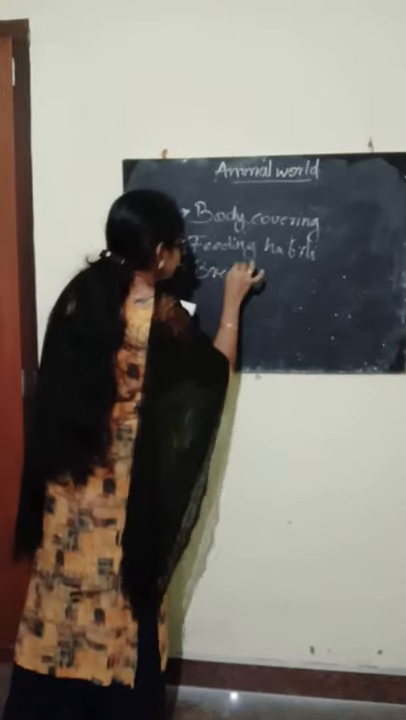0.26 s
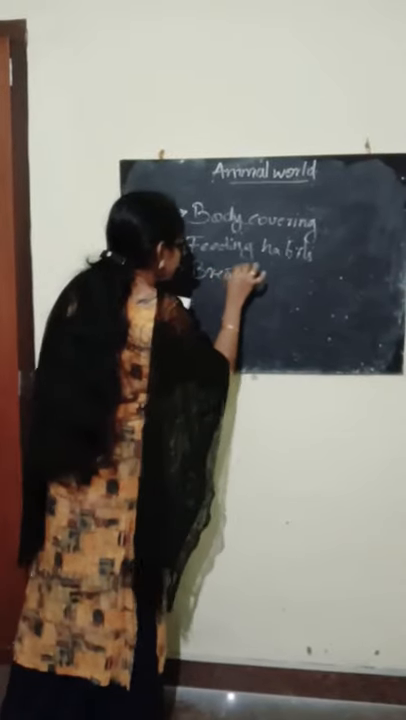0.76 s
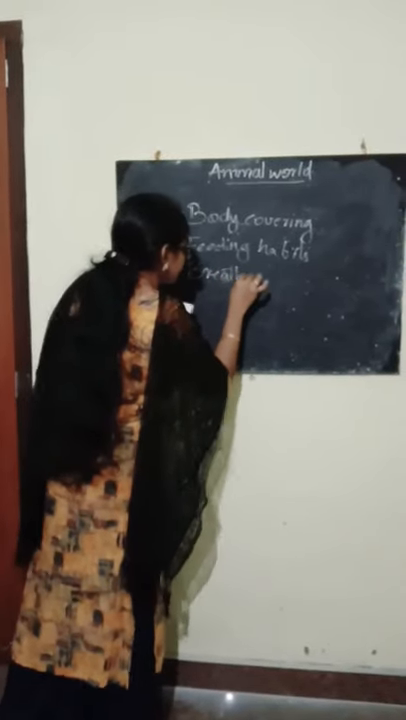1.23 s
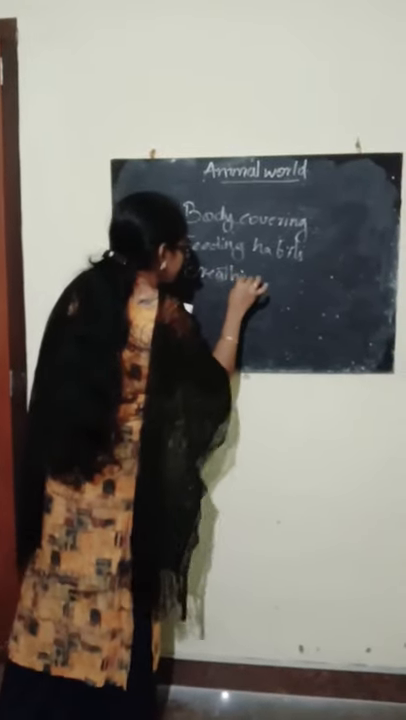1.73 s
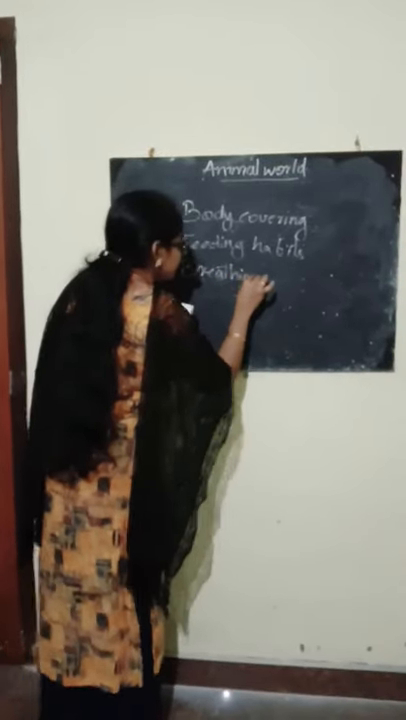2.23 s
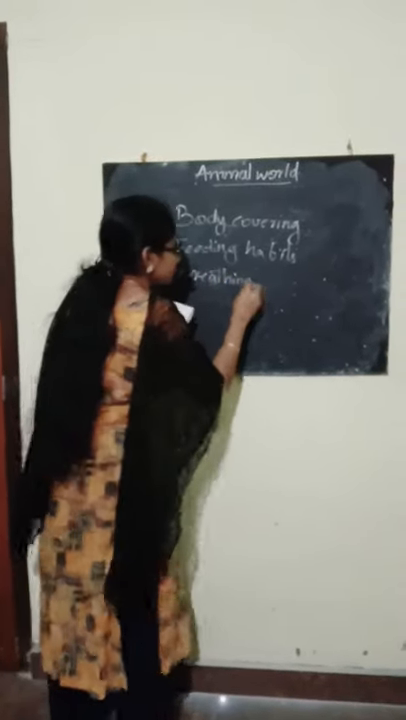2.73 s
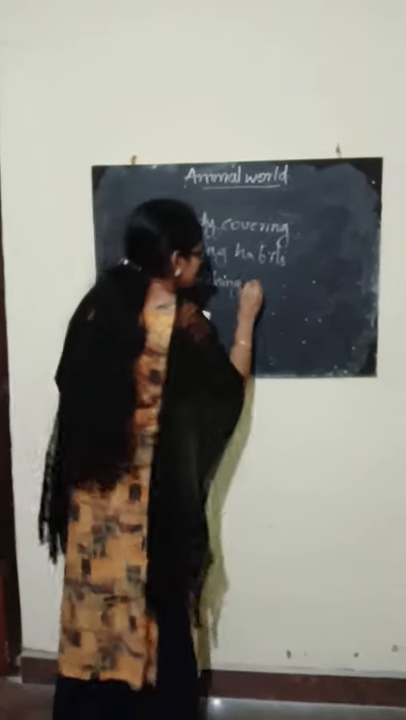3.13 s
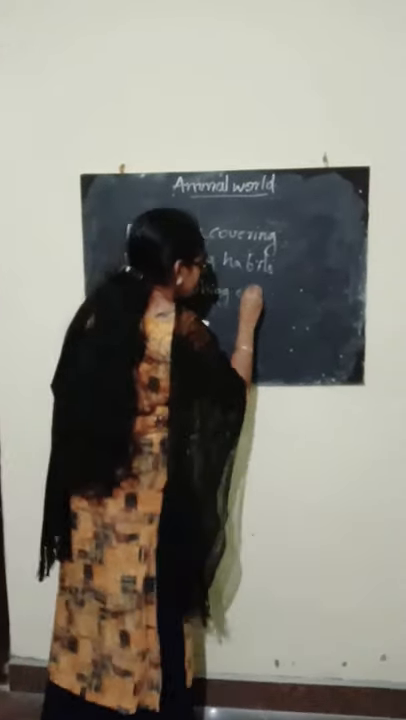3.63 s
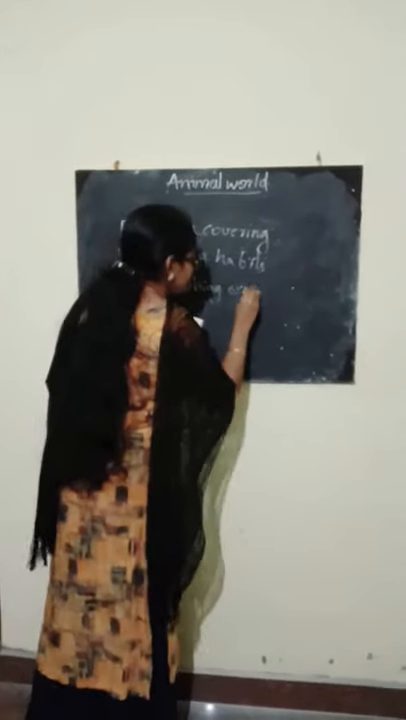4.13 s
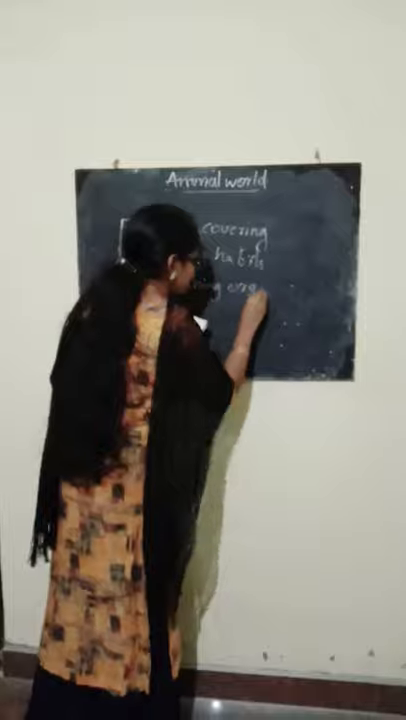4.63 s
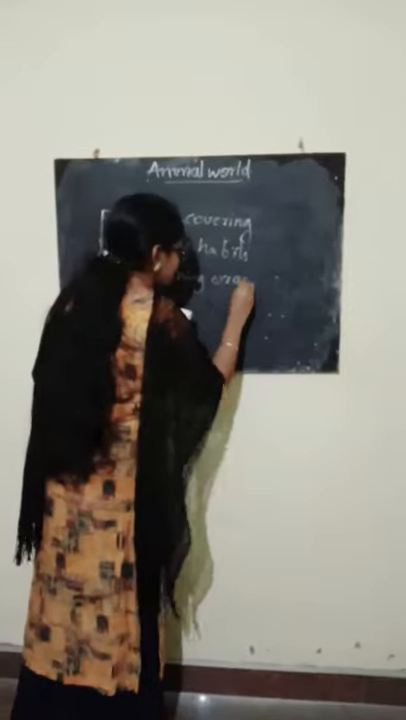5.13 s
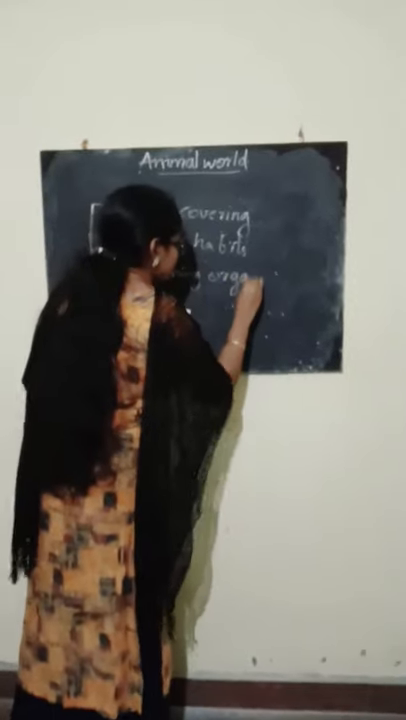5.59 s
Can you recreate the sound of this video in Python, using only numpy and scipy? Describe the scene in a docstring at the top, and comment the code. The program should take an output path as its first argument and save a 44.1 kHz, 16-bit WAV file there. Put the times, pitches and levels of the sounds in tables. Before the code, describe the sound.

Dry chalk strokes drum, rasp and hiss against a resonant board, mixed with woody knocks and a few very brief groans or squeaks. The rhythm is handwriting-like, with tiny gaps and a lull near the middle. A faint whirr and soft room hiss stay behind; the sound is nearly mono, roomy and somewhat nasal.

```python
"""Chalk writing on a blackboard

Chalk knocks on a wall-hung board in a small, bare room: filtered impulse responses with echoes and a decaying tail.
Its dragging strokes are random trains of stick-slip pulses that drum, rasp and hiss; narrow noise bands squeak.
Board resonances colour the chalk; steady air noise and a faint whirr lie behind, heard by a nasal microphone."""
import sys
import numpy as np
from scipy import signal
from scipy.fft import rfft, irfft, next_fast_len
from scipy.io import wavfile

SR = 44100
rng = np.random.default_rng(int(sys.argv[2]) if len(sys.argv) > 2 else 0)


def bounce(signal):
    """Save signal as a 16-bit WAV file at the path given by the first command-line argument."""
    frames = np.transpose(np.atleast_2d(signal))
    limited = np.clip(frames, -1, 1)
    pcm = np.round(limited * 32767).astype(np.int16)
    wavfile.write(sys.argv[1], SR, pcm)


N = 258381
TIME = np.arange(N) / SR


def from_db(db):
    """Level to amplitude: 20 dB is a factor of ten."""
    return 10 ** (np.asarray(db) / 20)


def rms_one(x):
    """Normalisation to unit root-mean-square amplitude."""
    return x / np.sqrt(np.mean(x ** 2) + 1e-20)


def at_hz(points, hz):
    """Linear interpolation of a table along a logarithmic frequency axis."""
    known_hz, values = np.transpose(points)
    return np.interp(np.log(np.maximum(hz, 1)), np.log(known_hz), values)


def colour(x, spectrum):
    """Minimum-phase filtering: folding the cepstrum makes the (hz, level_db) outline causal."""
    size = next_fast_len(len(x) // 2 + 4096) * 2
    gain = from_db(at_hz(spectrum, np.fft.rfftfreq(size, 1 / SR)))
    cepstrum = irfft(np.log(gain))
    cepstrum[1:size // 2] *= 2
    cepstrum[size // 2 + 1:] = 0
    response = np.exp(rfft(cepstrum))
    return irfft(rfft(x, size) * response)[:len(x)]


def resonate(x, peaks):
    """Modal resonance: a chain of two-pole, two-zero filters lifts or dips (hz, width_hz, lift_db)."""
    for hz, width_hz, lift_db in peaks:
        half_width = np.pi * width_hz / SR
        turn = -2 * np.cos(2 * np.pi * hz / SR)
        zero = half_width * max(from_db(lift_db), 1)
        pole = half_width * max(from_db(-lift_db), 1)
        x = signal.lfilter([1 + zero, turn, 1 - zero], [1 + pole, turn, 1 - pole], x)
    return x


def taps(level_db=0.0, mode_width_hz=90, spot_depth=0.26):
    """Impact excitation: soft contact dulls a click, panel give deepens it and the spot struck picks a mode."""
    # chalk set down on the board: start_s, strength_db, contact cut-off contact_hz, steepness of that cut,
    # extra low panel thump_db, most excited mode_hz, its lift mode_db
    touches = [(0.3184, 6, 11200, 2.9, 2, 1260, 2.5), (0.6285, -0.5, 5500, 6, 3.5, 510, 5),
               (1.285, -7, 3800, 9, 5, 404, 9.5), (1.529, -0.5, 3720, 3.3, 8, 406, 1.5),
               (1.709, 1.5, 3440, 5.2, 5.5, 1170, 3), (3.5825, 1, 3570, 2.23, 5.5, 1230, 7),
               (4.024, 1.5, 3200, 3.14, 1.5, 800, 4), (4.869, -13.5, 1810, 7.5, -3, 910, 4.5)]
    # sound of a hard knock: hz, level_db
    hard_knock = [(50, -28), (100, -13), (180, -9.5), (300, -13), (500, -3), (800, -4), (1200, -3),
                  (1900, 0), (2800, -7), (4000, -6.5), (5600, -5.5), (8000, -6.5), (11000, -21),
                  (15000, -17)]
    out = np.zeros(N)
    hz = np.geomspace(30, SR / 2, 60)
    t = TIME[:SR // 100]
    for start_s, strength_db, contact_hz, steepness, thump_db, mode_hz, mode_db in touches:
        contact = -10 * np.log10(1 + (hz / contact_hz) ** steepness)
        thump = thump_db / (1 + (hz / 700) ** 2)
        knock = colour(room_response(), np.c_[hz, at_hz(hard_knock, hz) + contact + thump])
        # bending waves return from the edges of the panel within a few milliseconds
        edges = rng.standard_normal(len(t)) * np.exp(-t / .003)
        edges /= np.linalg.norm(edges)
        knock = knock + spot_depth * signal.fftconvolve(knock, edges)[:len(knock)]
        knock = resonate(knock, [(mode_hz, mode_width_hz, mode_db)]) / np.hypot(1, spot_depth)
        start = round(start_s * SR)
        out[start:start + len(knock)] += from_db(level_db + strength_db) * knock[:N - start]
    return out


def room_response(early_db=0.5, sparse_db=3.5):
    """Reverberation: direct path and wall echoes over diffuse reflections that decay by band, at unit energy."""
    # reverberation time of the room: hz, t60_s
    decay_times = [(150, 0.44), (400, 0.4), (1200, 0.42), (3000, 0.4), (7000, 0.43), (14000, 0.31)]
    # straight path and first wall echoes: delay_s, height relative to a tail of unit energy
    first_echoes = [(0, 0.11), (.004, 0.13), (0.0114, .15), (.018, 0.15)]
    t = TIME[:SR * 3 // 4]
    # random levels make the reflections sparse
    uneven = from_db(sparse_db * rng.standard_normal(len(t)))
    scatter = rfft(rng.standard_normal(len(t)) * uneven)
    hz = np.fft.rfftfreq(len(t), 1 / SR)
    tail = 0
    for centre_hz, t60_s in decay_times:
        band = at_hz([(f, f == centre_hz) for f, _ in decay_times], hz)
        tail = tail + irfft(scatter * band, len(t)) * from_db(-60 * t / t60_s)
    # reflections thicken within a few milliseconds; the lift from the near walls fades around 25 ms
    build_up = 1 - .78 * np.exp(-t / .0035)
    near_walls = 1 / (1 + (t / .025) ** 6)
    tail *= build_up * from_db(early_db * near_walls)
    tail /= np.linalg.norm(tail)
    for delay_s, height in first_echoes:
        tail[round(delay_s * SR)] += height
    return tail / np.linalg.norm(tail)


def strokes():
    """Stick-slip friction: coarse slips shake the panel, finer ones rasp, crumbling powder hisses."""
    # colours of the three parts: hz, level_db
    drum_colour = [(50, -29), (110, -9.5), (190, -3.5), (340, -1), (520, 7), (850, 0), (1300, -12.5),
                   (2500, -33)]
    rasp_colour = [(600, -44.5), (1200, 4.5), (1900, 4), (2700, -1), (4000, -4.5), (5500, -8), (9000, -34)]
    powder_colour = [(2500, -26), (4200, -5), (5600, -2), (8000, 1), (11000, -25.5), (15000, -17)]
    drumming = stroke_level(0, brush_db=-77.5) * friction(drum_colour, slips_per_s=1200)
    rasp = stroke_level(1, brush_db=-74.5) * friction(rasp_colour, slips_per_s=2000)
    powder = stroke_level(2, brush_db=-80.5) * friction(powder_colour, slips_per_s=4400)
    return drumming + rasp + powder


def stroke_level(part, brush_db):
    """Energy build-up and decay: speed arches add power to a light brushing, drawn out by the room."""
    # pulls of the chalk: start_s, length_s, then levels before the room's smoothing: drum_db, rasp_db, powder_db
    pulls = [(0.0, 0.034, -57, -64.5, -67.5), (0.1, 0.086, -67.5, -83, -69), (0.397, .10, -54.5, -58, -67),
             (0.682, 0.087, -60.5, -67, -61), (0.858, 0.11, -61, -72, -64),
             (1.012, 0.085, -59.5, -67.5, -65.5), (1.129, 0.061, -63, -69, -67),
             (1.35, 0.054, -58, -73, -65), (1.863, 0.072, -65.5, -81, -70),
             (1.967, 0.079, -77, -71.5, -67.5), (2.06, 0.12, -65, -69.5, -69),
             (2.199, 0.12, -76, -68, -64.5), (2.305, 0.068, -67, -67, -66), (2.41, .10, -67.5, -67.5, -59),
             (2.474, 0.12, -57.5, -61, -66), (2.546, 0.12, -62.5, -61, -59), (2.675, .09, -84, -77, -72.5),
             (2.998, 0.13, -71, -75.5, -94), (3.132, 0.045, -67, -69, -72.5),
             (3.183, 0.14, -76, -71, -66.5), (3.313, 0.082, -54, -57, -67),
             (3.412, 0.066, -66.5, -66.5, -64.5), (3.698, 0.073, -65.5, -70, -65.5),
             (3.833, 0.088, -61, -67, -66.5), (4.095, 0.2, -77, -71.5, -70.5),
             (4.294, 0.057, -63, -66.5, -71), (4.411, 0.14, -59, -74, -60.5), (4.556, .15, -60, -62, -61.5),
             (4.856, 0.064, -74, -68, -91), (5.06, 0.089, -69, -74, -69), (5.188, 0.11, -68, -64, -68.5),
             (5.336, 0.079, -64.5, -64.5, -63), (5.585, 0.067, -69.5, -81, -70),
             (5.691, .12, -64, -66, -64.5)]
    # the hand rests and the brushing stops: from_s, to_s
    rest_from_s, rest_to_s = (2.8, 3.14)
    speed_power = 0.55  # amplitude follows hand speed to this power
    linger_t60_s = 0.27
    brushing = (TIME < rest_from_s) | (TIME > rest_to_s)
    power = from_db(brush_db) ** 2 * brushing
    for start_s, length_s, *levels_db in pulls:
        speed = np.sin(np.pi * np.clip((TIME - start_s) / length_s, 0, 1))
        power = power + (from_db(levels_db[part]) * speed ** speed_power) ** 2
    # share of the power left after one sample
    left = from_db(-60 / (linger_t60_s * SR)) ** 2
    return np.sqrt(signal.lfilter([1 - left], [1, -left], power))


def friction(spectrum, slips_per_s):
    """Random pulse train: uneven slips ring with a new colour at each spot passed, at unit rms."""
    slip_ring_s, smear_s, smear_db = 0.0027, 0.014, -10  # panel ring, then a faint smear off the near walls
    hop = SR // 8
    t = TIME[:hop]
    out = np.zeros(N + 5 * hop)
    decay = np.exp(-t / slip_ring_s) + from_db(smear_db) * np.exp(-t / smear_s)
    # neighbouring spots cross-fade
    passing = np.sin(np.linspace(0, np.pi, 2 * hop))
    for start in range(0, N + hop, hop):
        sizes = from_db(3 * np.minimum(rng.exponential(1, 2 * hop), 3))
        signs = rng.choice([-1, 1], 2 * hop)
        happens = rng.random(2 * hop) < slips_per_s / SR
        slips = passing * sizes * signs * happens
        spot_ring = decay * rng.standard_normal(hop)
        rubbed = colour(signal.fftconvolve(slips, spot_ring), spectrum)
        out[start:start + len(rubbed)] += rms_one(rubbed)
    return rms_one(out[hop:hop + N])


def squeaks():
    """Frictional resonance: slips falling into step sound as a brief, unsteady narrow-band groan or whistle."""
    # one resonance sings as the tip sticks: centre_s, length_s, pitch_hz, width_hz, level_db
    notes = [(0.901, 0.037, 1240, 79.5, -60.5), (1.04, 0.072, 406, 50, -59.5),
             (1.29, 0.019, 2800, 148, -60), (2.144, 0.039, 634, 80, -74), (2.557, 0.066, 1060, 90, -59),
             (3.059, 0.071, 790, 130, -64), (3.878, 0.073, 333, 50, -65.5), (4.485, 0.11, 332, 45, -65.5),
             (4.831, 0.058, 4430, 242, -67)]
    out = np.zeros(N)
    for centre_s, length_s, pitch_hz, width_hz, level_db in notes:
        b, a = signal.iirpeak(pitch_hz, pitch_hz / width_hz, fs=SR)
        note = signal.lfilter(b, a, rng.standard_normal(N))
        swell = np.exp(-(2 * (TIME - centre_s) / length_s) ** 2)
        note_rms = np.sqrt(np.average(note ** 2, weights=swell ** 2))
        out += from_db(level_db) * note * swell / note_rms
    return out


def whirr(level_db=-79.5):
    """Band-limited noise: a narrow pass band gives a faint, steady whirr."""
    band = signal.butter(2, [1205, 1315], "band", fs=SR, output="sos")
    return from_db(level_db) * rms_one(signal.sosfilt(band, rng.standard_normal(N)))


def air(spectrum):
    """Stationary random noise: room air and microphone hiss as filtered white noise of unit rms."""
    return rms_one(colour(rng.standard_normal(N), spectrum))


def scene():
    """Superposition: chalk through the board's modes sits in the middle, and only the air noise has width."""
    # resonances and a dip of the board: hz, width_hz, lift_db
    board_modes = [(252, 25.5, 9), (335.8, 13.1, 16), (410, 8.2, 5.5), (465.5, 8.7, 8), (676.7, 10.6, 9.5),
                   (753, 9.5, 6), (855, 3, 8), (1033, 60, 5.5), (1412, 12, 7.5), (1500, 7.5, 3.5),
                   (2807, 395, 8.5), (3280, 13, -10.5), (3265, 28, 9.5), (5876, 18, 10), (7330, 1080, 4)]
    # steady background common to both ears: hz, level_db
    air_mid = [(25, -48), (45, -17), (70, -2), (120, -1), (250, -3.5), (500, -10.5), (900, -11.5),
               (1500, -12), (2800, -13), (4500, -19.5), (8000, -23.5), (11000, -33), (15000, -40)]
    # background of opposite sign at the two ears: hz, level_db
    air_side = [(30, -13), (80, 2), (200, 3.5), (600, 0.5), (2000, -7.5), (5000, -4), (10000, -38),
                (15000, -16)]
    air_db, air_side_db = -67, -81.5
    chalk = resonate(taps() + strokes() + squeaks(), board_modes)
    mid = chalk + from_db(air_db) * air(air_mid) + whirr()
    side = from_db(air_side_db) * air(air_side)
    return np.array([mid + side, mid - side])


def record(dry):
    """Transducer response: resonances of the microphone port colour everything and a steep low-pass cuts the top."""
    # narrow nasal ring of the microphone: hz, width_hz, lift_db
    nasal_ring = [(1243, 80, 12.5)]
    # other resonances and dips of the port: hz, width_hz, lift_db
    port_modes = [(6610, 145, -12), (7620, 870, 5.5), (10640, 4700, -2.5), (15500, 1620, 11.5)]
    cutoff_hz = 15650
    top_cut = signal.ellip(12, .1, 80, cutoff_hz, fs=SR, output="sos")
    return signal.sosfilt(top_cut, resonate(dry, nasal_ring + port_modes))


dry = scene()
out = record(dry)
bounce(out)
```